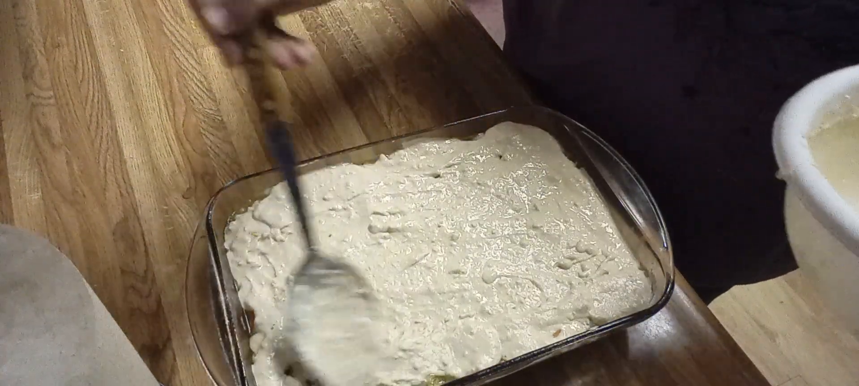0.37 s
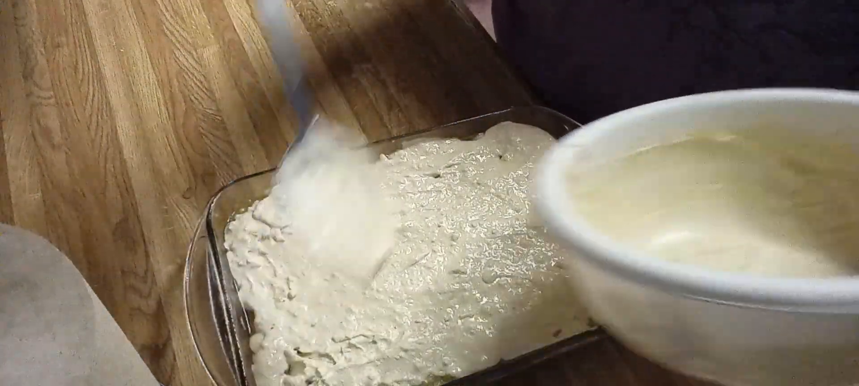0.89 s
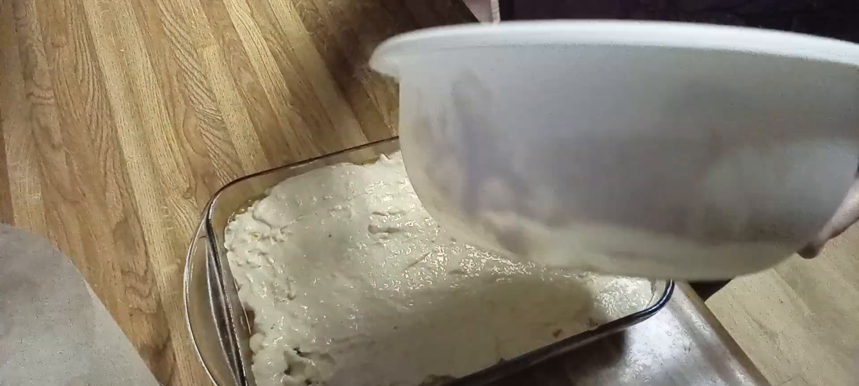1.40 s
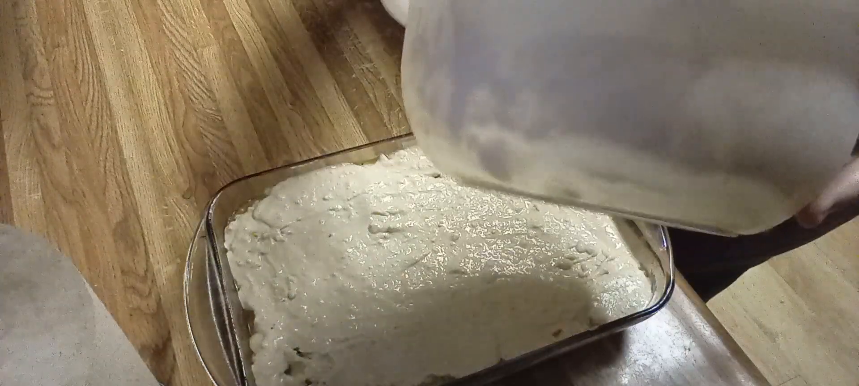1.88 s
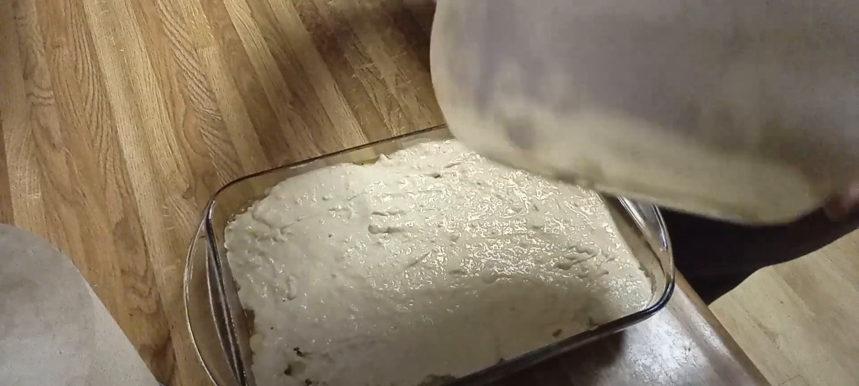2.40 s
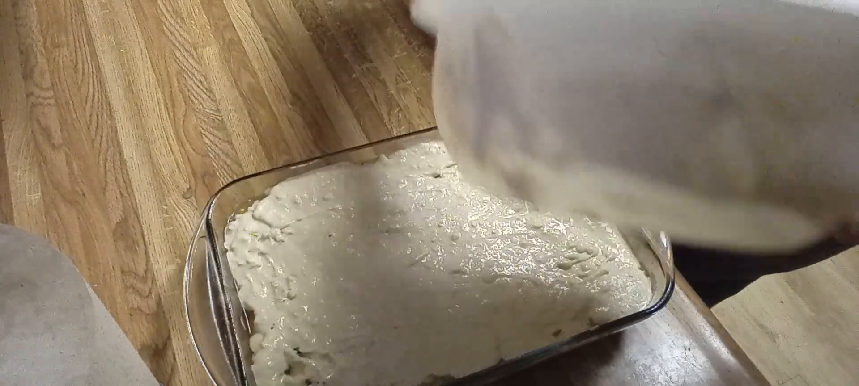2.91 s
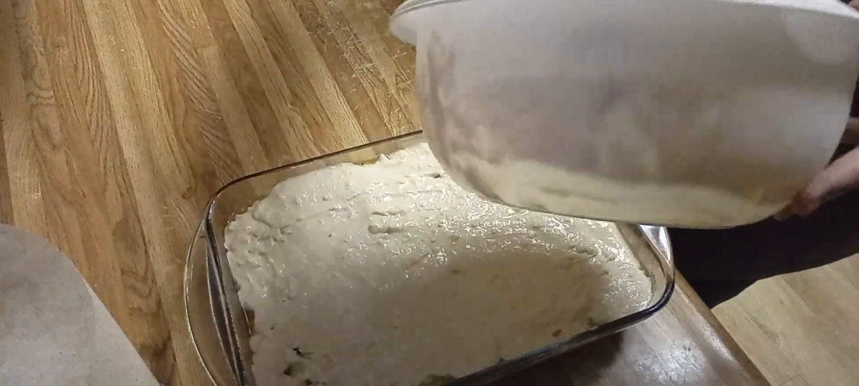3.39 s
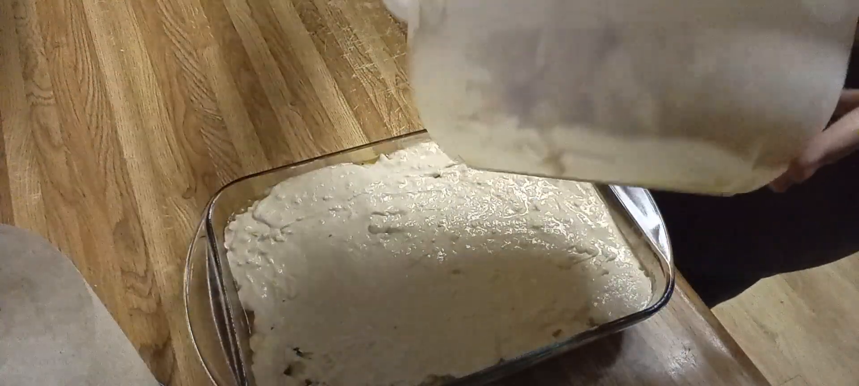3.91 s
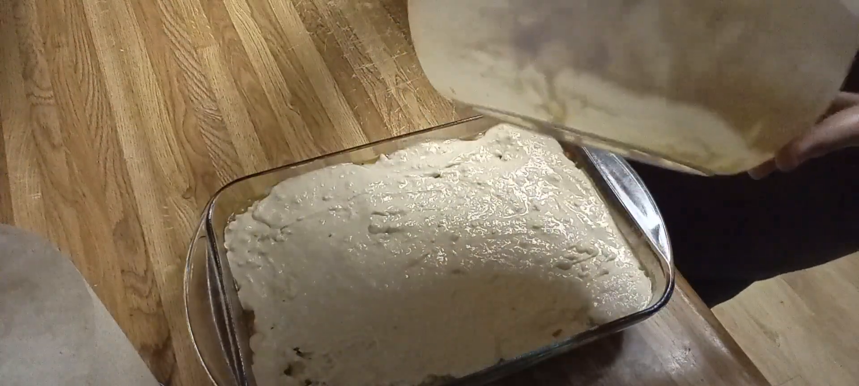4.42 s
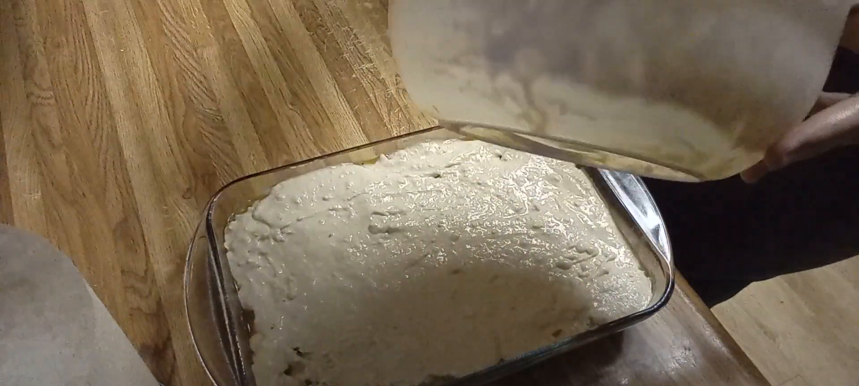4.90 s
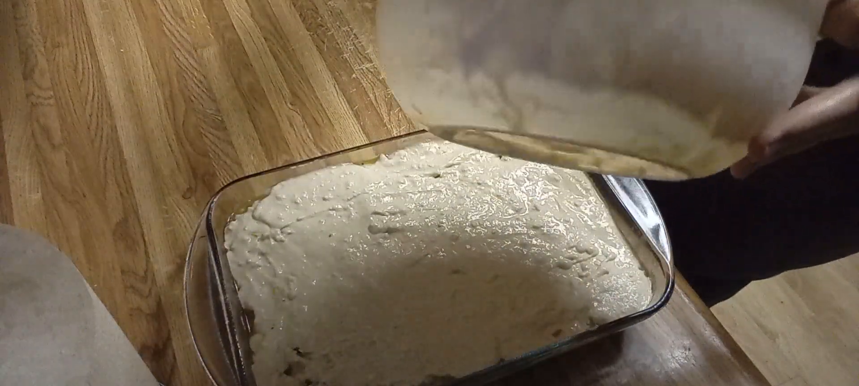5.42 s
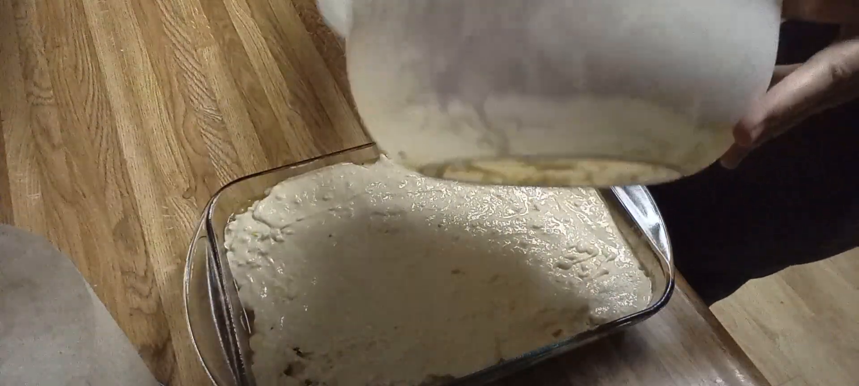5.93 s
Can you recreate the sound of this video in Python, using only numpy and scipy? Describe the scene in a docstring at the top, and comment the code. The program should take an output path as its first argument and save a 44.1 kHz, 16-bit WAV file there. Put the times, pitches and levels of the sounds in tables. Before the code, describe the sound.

Hollow plastic bowl knocks and short gritty spoon scrapes, sparse at first, then crowding into a rapid clatter, close up in a small quiet kitchen.

```python
"""Spoon in a plastic mixing bowl

A steel spoon lands in a hand-held plastic bowl, drags through batter along the wall and knocks the rim.
Knocks excite decaying bowl modes; drags are random slips convolved with the same bowl.
Filtered-noise reflections make the kitchen; behind are air noise, fridge hum and a fading deep tone.
Narrow noise bands flicker faintly. Two microphones a few centimetres apart hear each low mode
at a different phase."""
import sys
import numpy as np
from scipy import signal
from scipy.fft import rfft, irfft, next_fast_len
from scipy.io import wavfile
from scipy.ndimage import uniform_filter1d

SR = 44100
rng = np.random.default_rng(int(sys.argv[2]) if len(sys.argv) > 2 else 0)


def rack_gain(trim_db):
    """Turn a fader trim in dB into the linear factor to multiply a signal by."""
    fader = np.asarray(trim_db, float)
    return 10 ** (fader / 20)


def materialize(psi):
    """Save the field psi as 16-bit PCM at rate SR to the path in sys.argv[1].

    A 1-D psi becomes a single channel; in a 2-D psi each row is a channel.
    """
    bounded = np.clip(np.atleast_2d(psi).T, -1, 1)
    quanta = np.round(bounded * 32767).astype(np.int16)
    wavfile.write(sys.argv[1], SR, quanta)


N = 266623

# spoon knocks: (time [s], force [dB], spot [0 wall - 1 rim], relative thud [dB], relative crack [dB])
KNOCKS = [(1.315, -17, 0.2, 3, -0.5), (1.436, -42, 0.02, -19, -12), (1.484, -45, 0.015, -18, -20),
          (1.667, -23.5, 0.16, 5, 1.5), (1.788, -40.5, 0.6, 4, -4), (1.844, -39, 0.56, -10, 16),
          (1.932, -17, 0.76, 1.5, 6), (2.158, -21, 0.033, -2.5, 0.5), (2.265, -45.5, 0.82, -5, 24),
          (2.299, -18.5, 0.67, 6.5, 8.5), (2.51, -15.5, 0.63, 9, 3.5), (2.807, -38, 0.057, 6, 16),
          (3.045, -21.5, 0.53, 4.5, 8.5), (3.1, -25, 0.88, 13.5, 5.5), (3.339, -27, 0.68, 15, 14),
          (3.347, -22, 0.59, 22.5, 5), (3.649, -27.5, 0.58, 17.5, 10.5), (3.706, -28, 0.37, 22.5, 5),
          (3.714, -22, 0.65, 11, -1), (4.21, -50, .4, 36.5, 6), (4.272, -28.5, 1, 5.5, 3.5),
          (4.367, -36, 0.69, -4, 7), (4.586, -16.5, 0.82, 7.5, 1), (4.723, -13.5, 0.72, 5, 2),
          (4.912, -16, 0.094, 4.5, 5), (5.021, -12, 0.8, 1.5, -2), (5.185, -18, .15, 9.5, 6),
          (5.225, -41, .2, 0, 24), (5.286, -18, 0.98, 3, 2.5), (5.34, -34.5, .1, 0, 2),
          (5.447, -17, 0.04, 3.5, 3), (5.539, -18, 0.91, 2.5, 5), (5.595, -34, .5, -7, -3),
          (5.735, -35, 1, 15, 19.5), (5.811, -30.5, 0.34, 15, -14)]
# low bowl modes: (frequency [Hz], struck on wall [dB], struck on rim [dB], slow decay t60 [s],
# left minus right [dB], left phase lead [rad])
BOWL_MODES = [(95.2, -14.5, -6.5, 0.13, 4, 1), (120, -15.5, -30, 0.081, -8, -1.4),
              (144, -18.5, 1.5, 0.11, 0, 0), (192.8, -2, -53, 0.14, -1, -0.7),
              (233.3, -4, -36, 0.11, -8.5, 1), (278, -25.5, 1.5, 0.2, -6, -0.46),
              (368, 5.5, -7.5, 0.16, 8.5, 2.47), (396.5, -8.5, -3, 0.21, -3, -2.3),
              (443, -44.5, -13.5, 0.47, 12, 0.7), (516.4, -14.5, 0.5, 0.14, 14, 0.55),
              (559.3, -17, 3.5, 0.14, -14.5, 2.2), (670, -13.5, -0.5, 0.025, 5.5, 0.8),
              (715, -3.5, -3.5, 0.091, -5.5, 0.3), (815, -10, 3, 0.036, 12.5, 0.7),
              (862, -28, -12, 0.03, -41, 6), (1100, -10, -11, 0.056, 26, -0.15),
              (1163, -2.5, 8, 0.018, 10.5, -1.14), (1203, 8.5, -10.5, 0.039, 3.5, -4),
              (1297, 1.5, -9, 0.022, -22, 1)]
# drags at full pressure: (time [s], hold [s], grit [dB], hiss over grit [dB], bowl drone over grit [dB])
STROKES = [(1.443, 0.024, -43.5, -7, -3), (1.501, 0.037, -64, 0, 3), (1.69, 0.043, -56.5, -11, 6.5),
           (1.812, 0.015, -50.5, -38, 3), (1.866, 0.023, -40.5, 5, -14), (2.277, 0.042, -45, 5, -7),
           (2.568, 0.027, -44, -29, 2), (2.606, 0.015, -41.5, 8, -14.5), (2.808, 0.091, -39.5, -2, -31),
           (3.046, 0.02, -49, 12, -20), (3.102, .055, -41.5, 3, -9), (3.364, 0.023, -48.5, -24, 1.5),
           (3.418, 0.0091, -41.5, -7.5, -14), (3.733, 0.021, -46.5, -7, 5.5),
           (3.774, 0.055, -36.5, -1, -18), (3.87, 0.043, -40.5, -14, -30),
           (3.925, 0.028, -39.5, -12.5, -26), (4.219, 0.011, -65.5, 4, -12), (4.268, 0.019, -43, -13, 0.5),
           (4.326, 0.039, -51.5, 6.5, -17), (4.376, 0.041, -43, 1, -9.5), (4.68, 0.068, -43, 5.5, -7.5),
           (4.959, 0.023, -41.5, 2, -6.5), (5.231, 0.019, -42, 1, -14), (5.345, .02, -51.5, -19, 2),
           (5.379, 0.043, -54, -8, -6), (5.481, 0.03, -42.5, -1.5, -10), (5.595, 0.011, -48.5, -24, 0.5),
           (5.746, 0.016, -57, 0, -10), (5.792, 0.016, -43, -8, -10), (5.876, 0.051, -45, -10.5, -20),
           (5.941, .03, -65, -8, -14), (5.991, 0.043, -49, -22, -10)]
# colour of the grit: (frequency [Hz], level [dB])
GRIT_COLOUR = [(500, -30), (850, -21.5), (1150, 0), (1800, 6), (3000, -2), (5000, -13.5), (8000, -55.5),
               (16000, -52)]
# colour of the hiss: (frequency [Hz], level [dB])
HISS_COLOUR = [(1500, -20), (3000, -4), (4500, -4.5), (6500, -7.5), (7600, -15.5), (8500, -24),
               (13500, -21), (14800, -20), (16000, -12)]
# colour of a knock's crack: (frequency [Hz], level [dB])
CRACK_COLOUR = [(500, -52), (1000, -2), (1700, 3.5), (2500, -2), (4000, -8), (6500, -15.5), (8500, -29),
                (14000, -33), (16000, -47)]
# faint steel modes of the spoon: (frequency [Hz], level [dB], t60 [s])
SPOON_MODES = [(2220, -49, 0.53), (3296, -58, .3), (4420, -56, 0.35)]
# faint wet ticks of batter: (time [s], relative level [dB])
TICKS = [(0.529, -60.5), (.68, -80), (.815, -79)]
# colour of a tick: (frequency [Hz], level [dB])
TICK_COLOUR = [(6000, -30), (11000, -4), (15000, 10)]
# faint flickers, narrow noise bands: (time [s], frequency [Hz], width [Hz], level before the window [dB],
# length [s])
FLICKERS = [(0, 6840, 500, -76.5, 0.066), (0.04, 2670, 120, -72, 0.078), (.6, 6600, 150, -82, 0.12),
            (0.743, 7500, 100, -79, 0.17), (0.797, 2900, 300, -77, 0.056), (0.807, 6850, 100, -81, .12),
            (1.526, 2910, 250, -65, 0.12), (2.03, 9500, 303, -77, 0.089), (2.68, 10700, 300, -76, .08),
            (3.52, 2900, 300, -71, 0.065), (5.097, 9800, 300, -73, 0.1)]
# kitchen decay: (frequency [Hz], t60 [s])
ROOM_T60 = [(100, 0.1), (500, 0.24), (2000, 0.27), (6000, 0.28), (12000, 0.086)]
# colour of the room air: (frequency [Hz], level [dB])
AIR_COLOUR = [(12, -40.5), (20, -7.5), (43, -34.5), (77, -9.5), (138, -9.5), (187, -18), (328, -21.5),
              (558, -22), (759, -28), (1330, -24.5), (1530, -28.5), (6010, -38.5), (8890, -48.5),
              (14700, -48.5), (16000, -48)]
# likeness of left and right: (frequency [Hz], likeness [0-1])
LIKENESS = [(20, 0.93), (200, 0.8), (500, 0.32), (1200, 0.), (16000, 0)]
# fridge hum: (time [s], top of the throb [dB], dip between throbs [dB])
HUM = [(.15, -54, -13), (1, -63, -8), (1.6, -58, -17), (2, -61.5, -32), (2.701, -57, -33.5),
       (6.04, -55, -20)]
# fridge motor tones: (frequency [Hz], level [dB])
WHINE = [(560, -91.5), (1324, -88.5)]

THUD_BELOW_HZ, RING_HZ = 250, (340, 420)
RING_DB, RING_DB_PER_THUD_DB = 4.5, -0.2843  # a knock cushioned by batter thuds more and rings less
CRACK_T60_S, SNAP_S, SNAP_DB = 0.11, 0.0048, 7.5  # the crack rings out after a louder first snap
CONTACT_S = 0.00085  # the crack builds while the spoon digs in
PRESS_DB_PER_S, SAG_DB_PER_S, LIFT_DB_PER_S = 400, 91.5, 509  # pressure builds, eases, lets go
HISS_SLOPE, DRONE_SLOPE = 0.28, -0.16  # dB over grit per dB of pressure: hard dragging is brighter
AWAY_S, STROKE_RANGE_DB = 0.13, 36
SPOT_S = 0.02207  # time the spoon spends on one patch of wall
BASS_CUT_HZ, ALIKE_BELOW_HZ = 112, 186
ROOM_DB, AIR_DB = -14.5, -69.5
HUM_HZ, THROB_S, THROB_TOP_S = 120, 0.3535, 0.19
SWELL_S, SWELL_LENGTH_S, BEFORE_SWELL_DB = 0.12, 0.051, -9.5  # the low tones come up together
DEEP_HZ, DEEP_DB, DEEP_SAG_DB_PER_S, DEEP_HOLD_S, DEEP_FADE_DB_PER_S = 68.2, -56, 1.5, 1.52, 22.5
TOP_HZ = 15700


def read(table, hz):
    """Value of an (Hz, value) table, straight on a log axis."""
    table_hz, value = np.transpose(table)
    return np.interp(np.log(np.maximum(hz, 1)), np.log(table_hz), value)


def unit(x):
    """Scale to rms 1."""
    return x / np.sqrt(np.mean(x ** 2))


def shade(x, gain):
    """Filter by a gain given as a function of frequency."""
    size = next_fast_len(x.shape[-1])
    spectrum = rfft(x, size) * gain(np.fft.rfftfreq(size, 1 / SR))
    return irfft(spectrum, size)[..., :x.shape[-1]]


def held_noise(size, hold):
    """Random levels, each held for hold samples, slewed once."""
    return uniform_filter1d(np.repeat(rng.standard_normal(size // hold + 1), hold), hold)


def walk(rate_hz):
    """Random levels held 1 / rate_hz s and slewed twice; spread about 0.8."""
    hold = int(SR / rate_hz)
    return 1.1 * uniform_filter1d(held_noise(N, hold), hold)[:N]


def add(out, x, s):
    """Mix x into out from time s."""
    i = int(s * SR)
    out[:, i:i + x.shape[1]] += x[:, :N - i]


def highpass(x, order, cut_hz):
    """Butterworth high-pass."""
    return signal.sosfilt(signal.butter(order, cut_hz, "high", fs=SR, output="sos"), x)


def knocks():
    """Each knock is a short push and a small bounce into the low modes, and a crack from the upper ones."""
    out = np.zeros((2, N))
    hz, wall_db, rim_db = np.transpose(BOWL_MODES)[:3]
    in_ring = (hz > RING_HZ[0]) & (hz < RING_HZ[1])
    for s, force_db, spot, thud_db, crack_db in KNOCKS:
        ring_db = RING_DB + RING_DB_PER_THUD_DB * thud_db
        mode_db = wall_db + np.clip(spot, 0, 1) * (rim_db - wall_db) + 2.74 * rng.standard_normal(len(hz))
        mode_db += thud_db * (hz < THUD_BELOW_HZ) + ring_db * in_ring
        push = np.zeros((1, 512))
        push[0, 0] = 1
        bounce_s = rng.uniform(0.002, 0.008)
        push[0, int(bounce_s * SR)] = 0.27
        body = -rack_gain(-16) * low_modes(mode_db, 0.55) + spoon()
        crack = high_modes(CRACK_COLOUR, CRACK_T60_S, 0.2, 1.96)[0]
        t = np.arange(crack.shape[1]) / SR
        snap_db = SNAP_DB * np.exp(-t / SNAP_S)
        crack = crack * (1 - np.exp(-t / CONTACT_S))
        body[:, :crack.shape[1]] += rack_gain(crack_db + 5.5 + snap_db) * crack
        add(out, rack_gain(force_db) * signal.fftconvolve(body, push), s)
    return out


def low_modes(mode_db, rise_cycles):
    """The bowl's clear low modes at both microphones: decaying sines that take a cycle or so to build up."""
    hz, _, _, t60, pan_db, lead_rad = np.transpose(BOWL_MODES)[:, :, None]
    t = np.arange(int(0.3 * SR)) / SR
    hz = hz * (1 + 0.017 * rng.standard_normal(hz.shape))  # the grip shifts them
    lag_rad = 1.275 * np.arange(len(hz))[:, None]  # the bending wave needs a few ms to gather
    # the wall flexes in the hand, so each ring wobbles in pitch
    wobble_hz = 22 * (0.62 + rng.random(hz.shape))
    start_rad = 2 * np.pi * rng.random(hz.shape)
    lag_rad = lag_rad + 0.98 * (np.sin(2 * np.pi * wobble_hz * t + start_rad) - np.sin(start_rad))
    # batter and fingers swallow much of the ring at once, least of the hollow main pair; the rest fades slowly
    swallowed = np.where(abs(hz - np.mean(RING_HZ)) < 45, 0.3, 1.2)
    fade = rack_gain(-60 * t / t60) + swallowed * rack_gain(-60 * t / (0.25 * t60))
    fade = fade * rack_gain(mode_db[:, None]) * (1 - np.exp(-t * hz / rise_cycles))
    ears = []
    for side in (0.5, -0.5):
        ring = np.sin(2 * np.pi * hz * t - lag_rad + side * lead_rad)
        ears.append(np.sum(rack_gain(side * pan_db) * fade * ring, axis=0))
    return np.array(ears)


def high_modes(colour, t60, damp, patchy_db, count=1):
    """Crowded upper modes as decaying noise bands, new at every spot and ear; the higher die faster."""
    t = np.arange(2560) / SR
    out = 0
    for hz in 500 * 2 ** np.arange(0, 5.1, 1 / 3):
        def band_gain(f):
            return rack_gain(read(colour, f)) * np.clip(1 - 3 * abs(np.log2(f / hz + 1e-9)), 0, 1)
        band = shade(rng.standard_normal((count, 2, len(t))), band_gain)
        patch_db = patchy_db * rng.standard_normal((count, 1, 1))
        out = out + band * rack_gain(patch_db - 60 * t / (t60 * (1000 / hz) ** damp))
    out = out * np.clip((t[-1] - t) / 0.022, 0, 1)
    return out / np.sqrt(np.sum(out ** 2) / 2 / count)  # mean energy 1 per spot and ear


def spoon():
    """The steel itself rings faintly after a knock: decaying sines."""
    hz, db, t60 = np.transpose(SPOON_MODES)[:, :, None]
    t = np.arange(int(0.3 * SR)) / SR
    phase = 2 * np.pi * rng.random((2, len(hz), 1))
    db = db + 4 * rng.standard_normal(hz.shape)
    return np.sum(rack_gain(db - 60 * t / t60) * np.sin(2 * np.pi * hz * t + phase), axis=1)


def thumps():
    """A knock also shoves the whole bowl, most when it thuds; the puff of air is a decaying low sine."""
    out = np.zeros((2, N))
    t = np.arange(int(0.1 * SR)) / SR
    puff = np.sin(2 * np.pi * 117.0 * t) * rack_gain(-60 * t / 0.29) * np.ones((2, 1))
    for s, force_db, _, thud_db, _ in KNOCKS:
        add(out, rack_gain(force_db + 1.74 * thud_db - 53.0) * puff, s)
    return highpass(out, 2, 42)


def strokes():
    """The spoon edge catches and slips thousands of times a second, and meets other modes as it moves on."""
    out = np.zeros((2, N))
    hz, wall_db, rim_db = np.transpose(BOWL_MODES)[:3]
    mean_db = (wall_db + rim_db) / 2
    for full_s, hold_s, grit_db, hiss_db, drone_db in STROKES:
        t, press_db = pressure(full_s, hold_s)
        start_s, end_s = t[[0, -1]]
        grit_db = grit_db + press_db
        hiss_db = hiss_db + HISS_SLOPE * press_db
        drone_db = drone_db + DRONE_SLOPE * press_db
        edge = np.clip(np.minimum((t - start_s) / 0.004, (end_s - t) / 0.012), 0, 1)
        slips = (rng.random(len(t)) < 18000 / SR) * rng.standard_normal(len(t))
        slips = slips * rack_gain(1.5 * rng.exponential(size=len(t)))
        judder_db = 0.8 * held_noise(len(t), 200)[:len(t)]
        slips = unit(slips * rack_gain(judder_db)) * edge * rack_gain(grit_db)

        mode_db = mean_db + 4 * rng.standard_normal(len(hz)) - 8 * (hz < RING_HZ[1])
        drone = low_modes(mode_db, 0.26)
        drone = drone / np.sqrt(np.sum(drone ** 2) / 2)
        add(out, signal.fftconvolve((slips * rack_gain(drone_db))[None], drone), start_s)

        spots_s = np.arange(start_s, end_s + SPOT_S, SPOT_S)[:, None]
        share = np.cos(np.pi / 2 * np.clip((t - spots_s) / SPOT_S, -1, 1))  # each spot fades into the next
        for gain_db, colour in ((0, GRIT_COLOUR), (hiss_db, HISS_COLOUR)):
            body = high_modes(colour, 0.03, 0.39, 0.67, count=len(spots_s))
            drive = (slips * rack_gain(gain_db) * share)[:, None]
            add(out, signal.fftconvolve(drive, body, axes=2).sum(axis=0), start_s)
    return out


def pressure(full_s, hold_s):
    """Times and dB under full pressure of one stroke; it cannot start before the spoon has landed."""
    knock_s = np.transpose(KNOCKS)[0]
    landings_s = knock_s[np.diff(knock_s, prepend=0) > AWAY_S]
    start_s = max(full_s - STROKE_RANGE_DB / PRESS_DB_PER_S, landings_s[landings_s < full_s][-1])
    t = np.arange(start_s, full_s + hold_s + STROKE_RANGE_DB / LIFT_DB_PER_S, 1 / SR)
    late_s = t - full_s
    press_db = (PRESS_DB_PER_S * np.minimum(late_s, 0) - SAG_DB_PER_S * np.clip(late_s, 0, hold_s)
                - LIFT_DB_PER_S * np.maximum(late_s - hold_s, 0))
    return t, press_db


def ticks():
    """Wet batter ticks: tiny bright bursts of decaying noise bands."""
    out = np.zeros((2, N))
    for s, db in TICKS:
        add(out, rack_gain(db + 24.5) * high_modes(TICK_COLOUR, 0.16, 0.43, 1.5)[0], s)
    return out


def flickers():
    """Faint flickers: narrow noise bands that swell and fade."""
    out = np.zeros((2, N))
    for s, hz, width_hz, db, length_s in FLICKERS:
        size = int(length_s * SR)
        band = shade(rng.standard_normal((2, size)), lambda f: np.exp(-((f - hz) / width_hz) ** 2))
        add(out, rack_gain(db) * unit(band) * np.hanning(size), s)
    return out


def kitchen(x):
    """Decaying noise as reflections, each band with its own decay; bass more alike at both microphones."""
    t = np.arange(int(0.5 * SR)) / SR
    tail = 0
    for hz in 90 * 2 ** np.arange(0, 8.):
        t60 = read(ROOM_T60, hz)
        band = shade(pair(len(t)), lambda f: np.clip(1 - abs(np.log2(f / hz + 1e-9)), 0, 1))
        tail = tail + band * rack_gain(-60 * t / t60) / np.sqrt(t60)
    tail = tail * np.clip((t - 0.004) / 0.01, 0, 1)
    tail = rack_gain(ROOM_DB) * tail / np.sqrt(np.sum(tail ** 2) / 2)
    return signal.fftconvolve(x, tail, axes=1)[:, :N]


def pair(size):
    """Two noises whose likeness falls with frequency."""
    mid, side = rng.standard_normal((2, size))
    mid = shade(mid, lambda f: np.sqrt((1 + np.clip(read(LIKENESS, f), 0, 1)) / 2))
    side = shade(side, lambda f: np.sqrt((1 - np.clip(read(LIKENESS, f), 0, 1)) / 2))
    return np.array([mid + side, mid - side])


def wavering_tone(hz, db, waver_hz):
    """Sine that drifts in pitch and level."""
    phase = 2 * np.pi * np.cumsum(hz + waver_hz * walk(22)) / SR
    return np.sqrt(2) * rack_gain(db + 2.1 * walk(4.7)) * np.sin(phase)


def fridge(swell):
    """A throbbing mains hum and thin motor tones, all wavering sines."""
    t = np.arange(N) / SR
    s, top_db, dip_db = np.transpose(HUM)
    trough = np.sin(np.pi * (t - THROB_TOP_S) / THROB_S) ** 4
    hum_db = np.interp(t, s, top_db) + BEFORE_SWELL_DB * (1 - swell) + np.interp(t, s, dip_db) * trough
    out = wavering_tone(HUM_HZ, hum_db, 0.1)
    for hz, db in WHINE:
        out = out + wavering_tone(hz, db + 4 * walk(53), 9.0)
    return out


def deep_tone(swell):
    """A wavering deep sine that comes up, sags, then dies away."""
    t = np.arange(N) / SR
    db = DEEP_DB - DEEP_SAG_DB_PER_S * t - DEEP_FADE_DB_PER_S * np.maximum(t - DEEP_HOLD_S, 0)
    db = db + 20 * np.log10(swell + 1e-3) + 0.85 * walk(9.2)
    return wavering_tone(DEEP_HZ, db, 0.3)


def room_air():
    """Shaped noise with a slightly drifting level."""
    noise = unit(shade(pair(N), lambda f: rack_gain(read(AIR_COLOUR, f))))
    return rack_gain(AIR_DB + 0.17 * walk(11.0)) * noise


def background():
    """Fridge, deep tone and room air together."""
    swell = np.clip((np.arange(N) / SR - SWELL_S) / SWELL_LENGTH_S, 0, 1)
    return fridge(swell) + deep_tone(swell) + room_air()


def scene():
    """Spoon, bowl and flickers in the kitchen over the background."""
    left, right = knocks() + strokes() + ticks() + flickers()
    # a small bowl radiates no deep bass, and long waves reach both microphones alike
    mid = highpass(left + right, 2, BASS_CUT_HZ) / 2
    side = highpass(left - right, 3, ALIKE_BELOW_HZ) / 2
    close = np.array([mid + side, mid - side])
    return close + kitchen(close) + thumps() + background()


def low_pass(x):
    """Removes everything above the highest recorded frequency."""
    return signal.sosfilt(signal.butter(12, 16490, fs=SR, output="sos"), x)


def record(dry):
    """A microphone pair, the left a little weaker, with a steep top cut."""
    balanced = dry * rack_gain([[-0.4], [0.4]])
    top_cut = signal.ellip(8, 0.2, 50, TOP_HZ, fs=SR, output="sos")
    mix = signal.sosfilt(top_cut, balanced)
    return low_pass(mix)


dry = scene()
out = record(dry)
materialize(out)
```